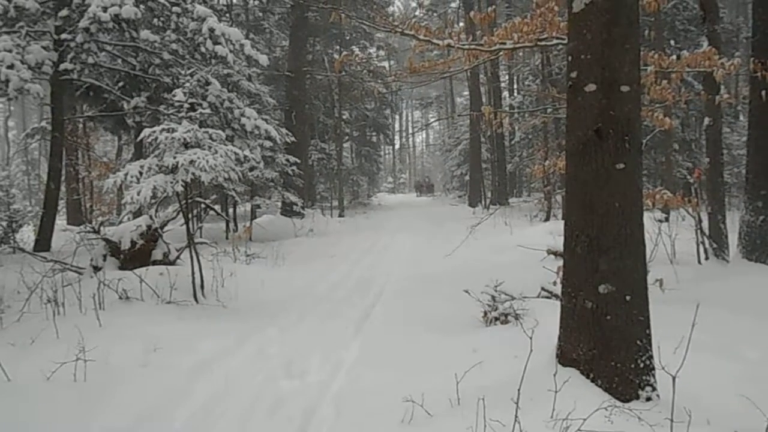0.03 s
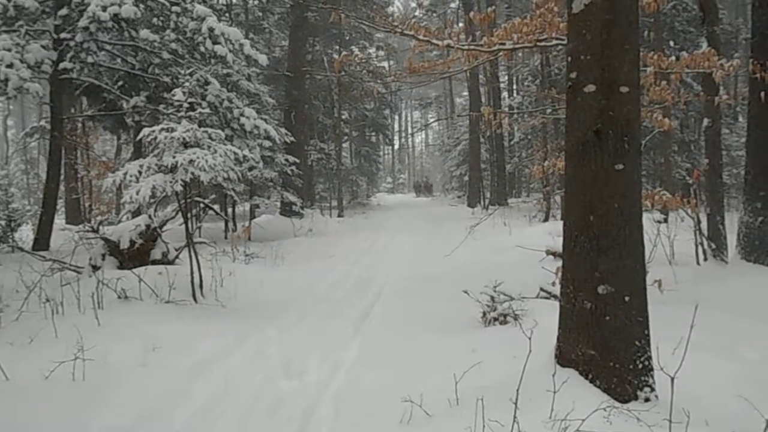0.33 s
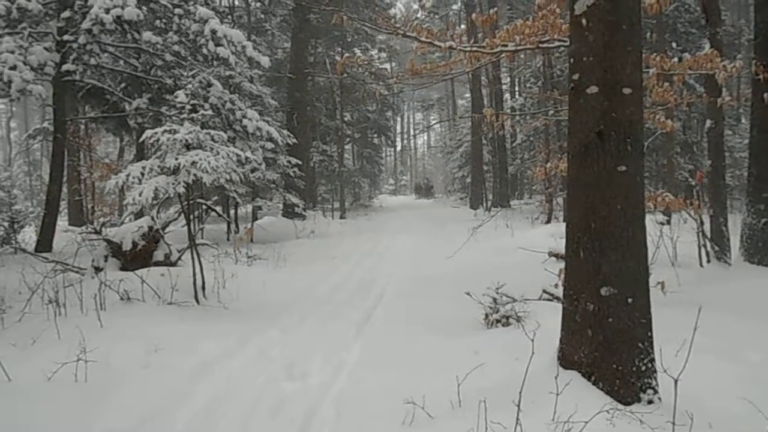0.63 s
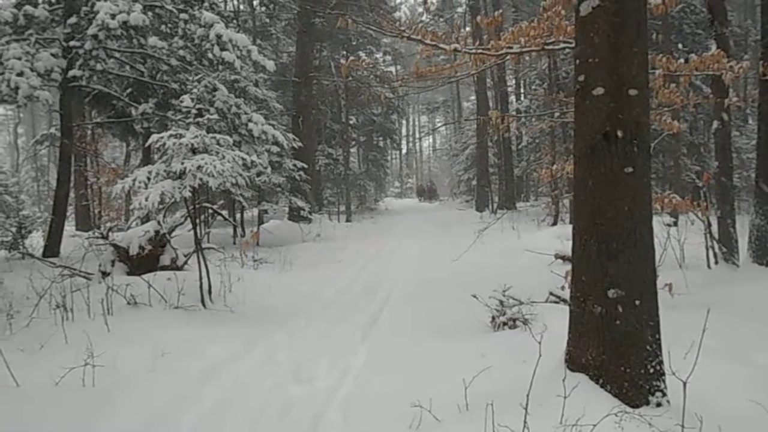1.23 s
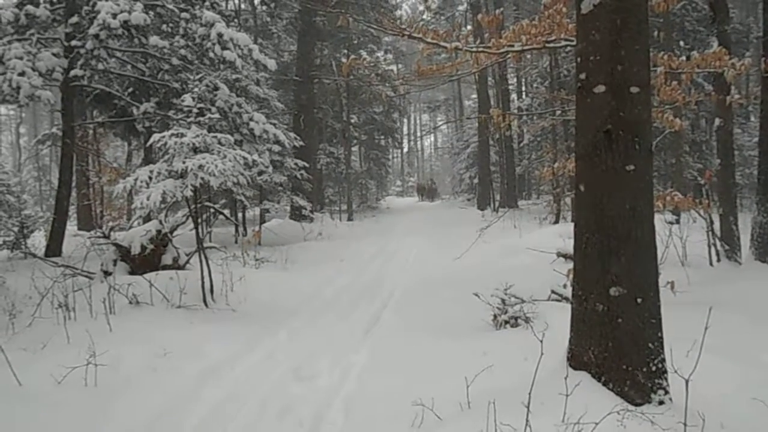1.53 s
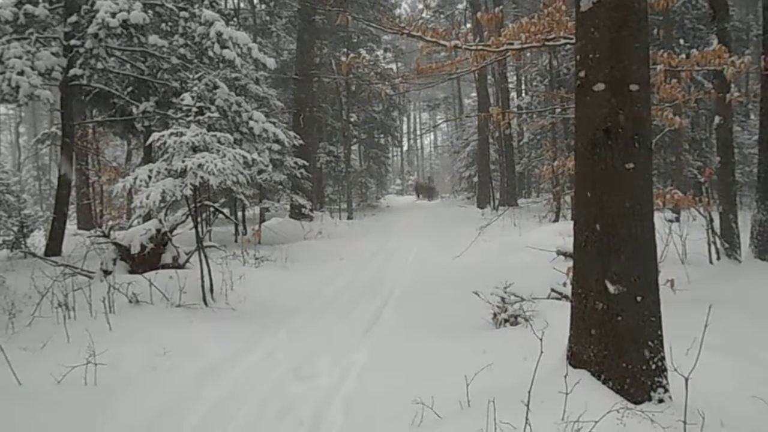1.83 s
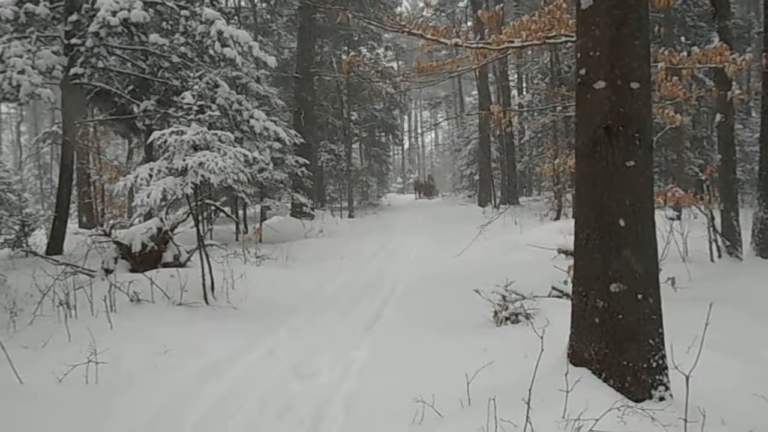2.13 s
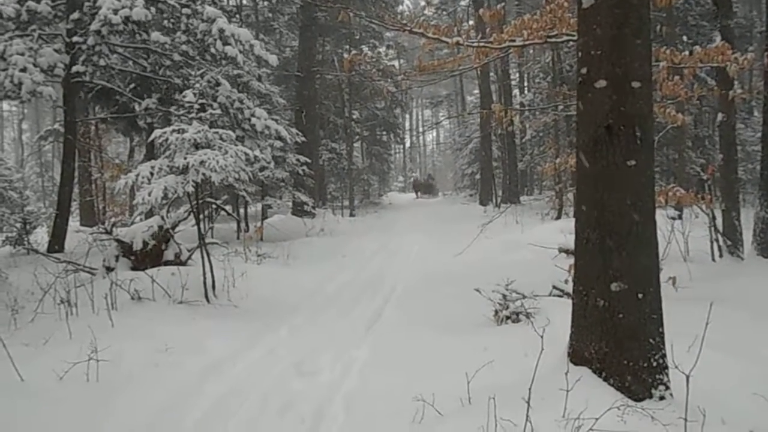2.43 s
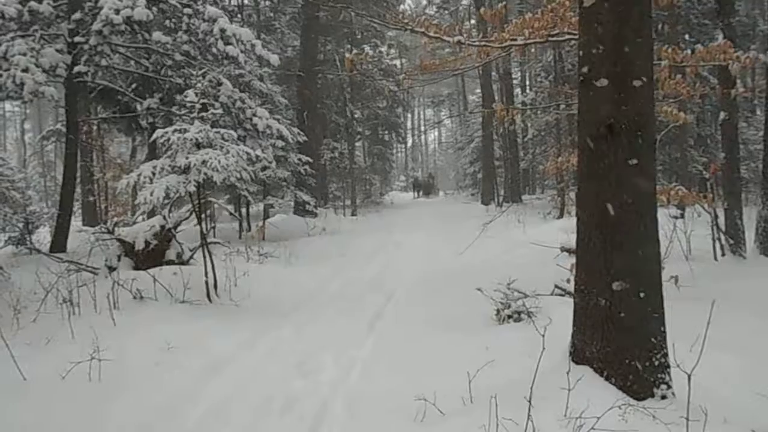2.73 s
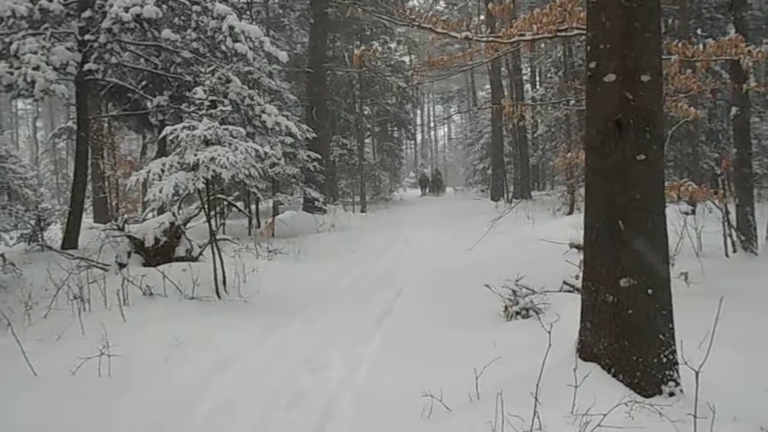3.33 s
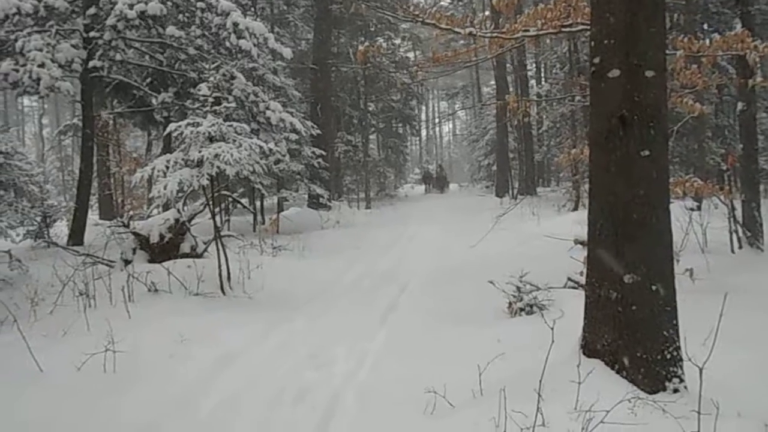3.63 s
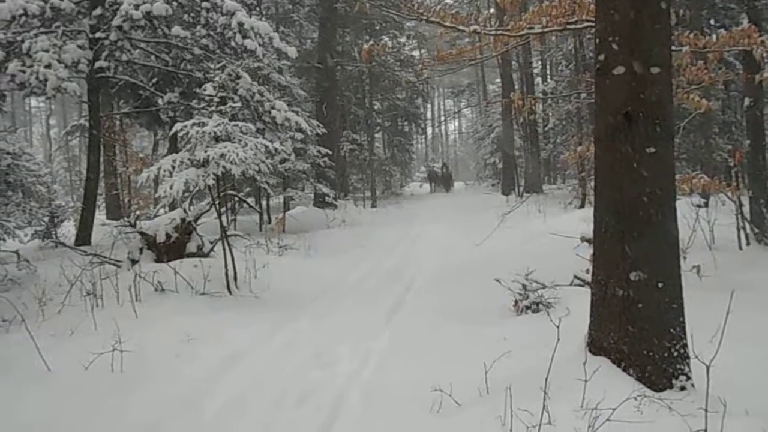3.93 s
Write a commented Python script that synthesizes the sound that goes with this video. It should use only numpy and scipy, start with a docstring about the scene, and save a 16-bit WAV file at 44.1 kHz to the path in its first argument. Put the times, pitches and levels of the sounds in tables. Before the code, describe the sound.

Sleigh bells jingle close by in uneven bursts throughout, bright and high, with a dry rattle of small links. A heavier metal piece clanks sharply at about 0.6, 1.3 and 1.9 seconds, then more lightly around 2.3, 2.7 and 3.1. Snow crunches softly at the start and near 1.2 seconds. A strong bell stroke comes just before 4 seconds. Soft wind hiss and a low rumble continue underneath.

```python
"""Sleigh bells on a snowy forest trail

Close to one microphone, small bells jingle in uneven bursts near 5 and 10 kHz, pellets and links rattle,
and a heavier piece of metal clanks now and then. Snow crunches softly twice. Farther off, wind hisses
in the trees over a low rumble of air. The recorder's gain ducks after the loudest clanks."""
import sys
import numpy as np
from scipy import signal
from scipy.fft import rfft, irfft
from scipy.io import wavfile
from scipy.ndimage import uniform_filter1d, minimum_filter1d

SR = 44100
rng = np.random.default_rng(int(sys.argv[2]) if len(sys.argv) > 2 else 0)


def generate_wav(signal):
    """Clip the signal to [-1, 1] and save it as 16-bit WAV at the path in sys.argv[1]."""
    frames = np.transpose(np.atleast_2d(signal))
    scaled = np.clip(frames, -1, 1) * 32767
    pcm = np.round(scaled).astype(np.int16)
    wavfile.write(sys.argv[1], SR, pcm)


N = 176400
TIME = np.arange(N) / SR
RING_TIME = np.arange(SR // 2) / SR
TREBLE_EDGE_HZ = 10950

# a bell's weak modes just above its main pitch: pitch_hz, level_db
BELL_NEIGHBOURS = [(5588, -19.5), (5905, -21)]
# its overtones, about an octave up: pitch_hz, level_db
BELL_OVERTONES = [(10190, -3), (10180, -3.5), (9360, -13.5), (11050, -19.5), (11820, -12)]

def small_bell(pitch_hz, overtone_db):
    """A pellet strikes the shell and rebounds inside it; close modes beat against the main one."""
    twin_spread_hz, twin_db, detune = 45, -11, 0.00475
    swell_s, rebound_within_s, rebound_db = 0.0013, 0.06, -10
    modes = [(pitch_hz, 0)] + [(pitch_hz + twin_spread_hz * rng.normal(), twin_db) for _ in range(3)]
    modes += [(hz * (1 + detune * rng.normal()), db + 3 * rng.normal()) for hz, db in BELL_NEIGHBOURS]
    modes += [(hz * (1 + detune * rng.normal()), db + overtone_db) for hz, db in BELL_OVERTONES]
    stroke = sum(from_db(db) * mode(hz, t60_s=0.18) for hz, db in modes)
    stroke *= 1 - np.exp(-RING_TIME / swell_s)   # the pellet rolls before the bell rings fully
    lags = (rng.uniform(0, rebound_within_s, size=4) * SR).astype(int)
    rebounds = sum(np.pad(stroke, (lag, 0))[:len(stroke)] for lag in lags)
    return np.std(stroke) * rms_one(stroke + from_db(rebound_db) * rebounds)


# clear strokes of the nearest bells: start_s, level_db, pitch_hz, overtone_db
BELL_STROKES = [(0.0997, -33, 5190, -25), (0.3835, -16, 5145, -14), (0.425, -30, 5180, -7),
                (0.493, -25.5, 5170, -6), (0.53, -36, 5180, -6), (0.62, -23.5, 5200, -8),
                (0.917, -34.5, 5210, 0), (1.1303, -30.5, 5180, -8), (1.203, -26, 5080, -6.5),
                (1.262, -40.5, 5100, 11), (1.45, -40, 5000, 13.5), (1.538, -33, 5260, 2.5),
                (1.658, -27, 5180, -3), (1.69, -32, 5160, -23), (1.8152, -23.5, 5094, -13.5),
                (2.072, -32, 5400, -23), (2.135, -30.5, 4960, 0), (2.24, -20, 5120, -7),
                (2.3047, -20.5, 5200, -14), (2.307, -25.5, 5700, -24), (2.748, -28, 5100, -10),
                (2.835, -28, 5080, -12), (2.925, -26.5, 5160, -7), (2.99, -28, 5080, -5.5),
                (3.03, -26, 5870, -17), (3.1996, -30, 5100, 6), (3.25, -34, 5130, -15),
                (3.33, -30, 5140, -4), (3.8272, -23.5, 5100, 4), (3.855, -25, 5200, -10),
                (3.9045, -22.5, 5060, -12), (3.9507, -11, 5150, -13.5)]
# how hard the bells and fittings are shaken: time_s, gain_db
SHAKING = [(0, 9.5), (.12, -8.5), (.2, 6.5), (.4, 3.5), (.58, 0), (.73, 0), (1.0, -2), (1.25, -3),
           (1.45, 4), (1.8, -4), (2.03, 0), (2.3, 3), (2.72, -1.5), (3.0, 3), (3.3, 4), (3.45, -7.5),
           (3.66, -3.5), (3.9, 4)]

def sleigh_bells():
    """Clear strokes stand over a shimmer of soft ones that follows the shaking."""
    out = np.zeros(N)
    for start_s, level_db, pitch_hz, overtone_db in BELL_STROKES:
        add(out, start_s, from_db(level_db) * small_bell(pitch_hz, overtone_db))
    bells = [small_bell(pitch_hz=5130 + 39 * rng.normal(), overtone_db=-3.5) for _ in range(10)]
    soft_strokes = grains(per_s=60, spread_db=3) * from_db(-45 + curve(SHAKING, TIME))
    which_bell = rng.integers(0, len(bells), N)
    for i in np.flatnonzero(soft_strokes):
        add(out, i / SR, soft_strokes[i] * bells[which_bell[i]])
    return out


# blows on the heavy fitting, close by: start_s, level_db, bass_db, treble_db, ring_db, favoured_hz (list)
FITTING_BLOWS = [(0.1626, -22, -10, 10, 1, [9750]), (0.187, -22.5, 9, 7, -5.5, [3052]),
                 (0.3881, -19.5, -12, -4, -6.5, [4355]),
                 (0.587, -3, -1.5, -3, -8, [1198, 1803, 3052, 4355, 4759]),
                 (1.0286, -20.5, -3, -4.5, -13, [3052, 4355]),
                 (1.318, -9.5, 2, -4, -2, [3844, 4064, 4355, 4759, 9080, 9750]),
                 (1.338, -14.5, 2, 5, -3.5, [4759]), (1.615, -25.5, 15, 7, -11, [1803]),
                 (1.9137, -4, 1.5, -4, -5.5, [3144, 4064, 4355]),
                 (2.261, -11, 6, -6, -2.5, [1198, 1803, 3144]), (2.277, -16, 7, -1, -2, [1803, 3052]),
                 (2.5296, -26, 4, 2, 2, [1168]), (2.62, -24, 9, 12, 5, [10170]),
                 (2.639, -20.5, 3, 8, -2.5, [1168]), (2.657, -15, 3, -8, -1.5, [1168, 1803]),
                 (3.1316, -15, 6, 1, -6, [3844, 9080]), (3.14, -14.5, 1, 5, -5, [4064, 5100]),
                 (3.288, -25.5, -14, -9, -5.5, [3052]), (3.3698, -23.5, -11, 13, -6, [4759]),
                 (3.512, -25.5, 12.5, 5, -9, [3144]), (3.898, -26, -16, -15, -5, [4064]),
                 (3.9283, -21.5, -19, 5, -13, [4355]), (3.9705, -22, -12, 10, -12, [3052])]
# its modes: pitch_hz, level_db, t60_s
FITTING_MODES = [(1168, -6, .1), (1198, -9, .2), (1803, -9, .26), (3052, -6, .31), (3144, 0, .1),
                 (3381, -3, .1), (3844, -1, .11), (4064, 0, .11), (4355, -3, .115), (4759, 1, .12),
                 (5100, -5, .1), (8600, -10, .12), (9080, -6, .15), (9750, -8, .15), (10170, -7, .12)]
# its dense, short clatter: frequency_hz, density_db
CLATTER_SPECTRUM = [(600, -33), (1000, -11.5), (1200, -6.5), (1400, -12.5), (1750, -5.5), (2300, -4),
                    (2700, -13), (3200, 0), (3600, -1), (4700, 1), (5500, -7.5), (6800, -15), (8300, -12),
                    (10100, -5), (11000, -18.5)]

def clanks():
    """Each blow gives a short clatter; the point of contact sets its colour and which modes ring out."""
    near_node_db, scatter_db, scatter_hz = -11.5, 2, 7
    out = np.zeros(N)
    for start_s, level_db, bass_db, treble_db, ring_db, favoured_hz in FITTING_BLOWS:
        tilt = [(2000, bass_db), (3300, 0), (4800, 0), (8500, treble_db)]
        spectrum = [(hz, db + curve(tilt, hz)) for hz, db in CLATTER_SPECTRUM]
        clatter = peaky_noise(spectrum, peaks_db=4, step_hz=90) * decay(t60_s=0.088)
        ring = np.zeros(len(RING_TIME))
        for hz, db, t60_s in FITTING_MODES:
            # modes with a node near the point of contact ring less
            mode_db = db + near_node_db * (hz not in favoured_hz) + scatter_db * rng.normal()
            ring += from_db(mode_db) * mode(hz + scatter_hz * rng.normal(), t60_s)
        add(out, start_s, from_db(level_db) * (clatter + from_db(ring_db) * ring))
    return out


# dry clicks of pellets and links, close by: start_s, level_db, t60_s
PELLET_CLICKS = [(0.034, -26, 0.018), (0.0988, -26, 0.012), (0.161, -19.5, 0.12), (0.511, -23, .04),
                 (0.85, -26.5, 0.018), (1.0812, -16.5, 0.008), (1.2544, -20.5, 0.13), (1.493, -24.5, 0.031),
                 (1.766, -27, 0.19), (1.8163, -23, 0.05), (2.042, -28, .02), (2.2052, -16.5, 0.11),
                 (2.397, -23, 0.023), (2.429, -27.5, 0.054), (2.8804, -21, 0.049), (2.892, -23, 0.23),
                 (3.024, -24.5, 0.15), (3.183, -23.5, 0.16), (3.3722, -16.5, 0.022), (3.471, -26, 0.048),
                 (3.5, -30, 0.036), (3.5136, -20, 0.016), (3.557, -27, 0.098), (3.691, -23.5, 0.025),
                 (3.7204, -21, 0.02), (3.786, -22, 0.086), (3.808, -21.5, 0.053), (3.827, -14, 0.055),
                 (3.898, -24, 0.023), (3.9503, -18, 0.024)]
# the colour of their knocking: frequency_hz, density_db
RATTLE_SPECTRUM = [(900, -7.5), (1800, -2.5), (2700, -5.5), (3700, 3), (4500, 0.5), (5600, -0.5),
                   (6800, -5.5), (7600, -0.5), (8600, -5.5), (9600, -6), (10600, -11), (12000, -35)]

def rattle():
    """Pellets and links knock: single sharp clicks among many small ticks that follow the shaking."""
    ticks = grains(per_s=170, spread_db=5)
    power = signal.fftconvolve(ticks ** 2, decay(t60_s=0.058) ** 2)[:N]
    envelope = np.sqrt(np.abs(power) / power.mean()) * from_db(-39 + curve(SHAKING, TIME))
    out = envelope * noise(RATTLE_SPECTRUM, N)
    for start_s, level_db, t60_s in PELLET_CLICKS:
        click = decay(t60_s) * peaky_noise(RATTLE_SPECTRUM, peaks_db=4.5, step_hz=350)
        add(out, start_s, from_db(level_db) * click)
    return butterworth(out, 2, 700, "high")


# links, then the fine shimmer of the farther bells: touches_per_s, base_db, low_hz, high_hz, t60_s
PING_LAYERS = [(148, -40, 3300, 5390, 0.026), (436, -46.5, 5800, 11000, 0.018)]

def pings(touches_per_s, base_db, low_hz, high_hz, t60_s):
    """Small metal parts touch, each with a brief pitch of its own and an inharmonic overtone."""
    overtone_ratio, overtone_db, ping_samples = 1.7, -8.5, SR // 32
    touches = grains(touches_per_s, spread_db=3.5) * from_db(base_db + curve(SHAKING, TIME) / 2)
    pitch_hz = low_hz * (high_hz / low_hz) ** rng.random(N)
    overtone_hz = pitch_hz * overtone_ratio * (1 + 0.12 * rng.standard_normal(N))
    overtone_gain = from_db(overtone_db) * (overtone_hz < TREBLE_EDGE_HZ)
    phase_per_hz = 2 * np.pi * RING_TIME[:ping_samples]
    envelope = decay(t60_s)[:ping_samples]
    out = np.zeros(N)
    for i in np.flatnonzero(touches):
        fundamental = np.sin(pitch_hz[i] * phase_per_hz)
        overtone = overtone_gain[i] * np.sin(overtone_hz[i] * phase_per_hz)
        add(out, i / SR, touches[i] * envelope * (fundamental + overtone))
    return out


# snow gives way on the trail: start_s, length_s, level_db
SNOW_CRUNCHES = [(0.083, 0.22, -27.5), (1.155, 0.07, -31.5)]
# the largest pops in it: start_s, level_db, pitch_hz
SNOW_POPS = [(0.097, -18.5, 234), (0.112, -13.5, 209), (0.167, -16.5, 650), (0.222, -18.5, 348),
             (0.233, -11, 198), (0.256, -22, 444), (0.279, -11.5, 289), (0.306, -14, 507),
             (1.182, -20, 382), (1.191, -18.5, 348)]

def snow():
    """Packed snow collapses in a run of dull little pops."""
    attack_s, release_s = 0.024, 0.042
    pops = grains(per_s=600, spread_db=0) * rng.choice([-1, 1], N)
    pops = butterworth(pops, 1, [101, 734], "band")
    pops = butterworth(pops, 2, [90, 2000], "band")
    attack = 1 - np.exp(-RING_TIME / attack_s)
    out = np.zeros(N)
    for start_s, length_s, level_db in SNOW_CRUNCHES:
        run = pops[int(start_s * SR):][:len(RING_TIME)]
        run = run / np.std(run[RING_TIME < length_s])
        release = np.exp(-np.maximum(RING_TIME - length_s, 0) / release_s)
        add(out, start_s, from_db(level_db) * attack * release * run)
    for start_s, level_db, pitch_hz in SNOW_POPS:
        add(out, start_s, from_db(level_db) * mode(pitch_hz, t60_s=0.013))
    return out


# wind in the trees around the trail: frequency_hz, density_db
WIND_SPECTRUM = [(60, -25), (110, -5.5), (165, -1.5), (400, -10), (750, -3.5), (1200, -6), (2600, -13.5),
                 (4000, -15.5), (7000, -26), (10000, -21), (12000, -47)]
# its strength: time_s, level_db
WIND_STRENGTH = [(0, -36), (.8, -35.5), (1.3, -35.5), (2.0, -36.5), (3.2, -35.5), (4, -33)]

def wind():
    """Wind hisses evenly in the trees; the level flutters by about a decibel."""
    flutter_db = rms_one(signal.resample(rng.standard_normal(40), N))
    return from_db(curve(WIND_STRENGTH, TIME) + flutter_db) * noise(WIND_SPECTRUM, N)


# low air at the microphone: frequency_hz, density_db
RUMBLE_SPECTRUM = [(20, 1), (36, 13), (50, -6.5), (65, -1.5), (79, 8), (95, 1), (130, -23), (250, -42)]
# its strength: time_s, level_db
RUMBLE_STRENGTH = [(0, -36), (.5, -37), (.9, -38), (1.35, -33), (1.7, -40), (2.2, -40.5), (2.7, -41),
                   (3.2, -40.5), (4, -37.5)]

def rumble():
    """The air buffets, mostly below 100 Hz."""
    return from_db(curve(RUMBLE_STRENGTH, TIME)) * noise(RUMBLE_SPECTRUM, N)


def from_db(db):
    """Decibels to gain."""
    return 10 ** (np.asarray(db) / 20)


def rms_one(x):
    """Scale to unit power."""
    return x / np.sqrt(np.mean(x ** 2) + 1e-20)


def curve(points, at):
    """Straight lines between points."""
    return np.interp(at, *np.transpose(points))


def butterworth(x, order, edges_hz, kind):
    """A low-, high- or band-pass filter."""
    return signal.sosfilt(signal.butter(order, edges_hz, kind, fs=SR, output="sos"), x)


def noise(spectrum, samples):
    """Noise with a given spectrum, at unit power."""
    hz, db = np.transpose(spectrum)
    bin_hz = np.maximum(np.fft.rfftfreq(samples, 1 / SR), 1)
    gain = from_db(np.interp(np.log(bin_hz), np.log(hz), db))
    return rms_one(irfft(rfft(rng.standard_normal(samples)) * gain, samples))


def peaky_noise(spectrum, peaks_db, step_hz):
    """A short noise with a given spectrum and random peaks of its own."""
    grid_hz = np.arange(600, 12500, step_hz)
    density_db = curve(spectrum, grid_hz) + peaks_db * rng.standard_normal(len(grid_hz))
    return noise(np.column_stack([grid_hz, density_db]), len(RING_TIME))


def decay(t60_s):
    """Exponential decay from 1."""
    return np.exp(-np.log(1000) * RING_TIME / t60_s)


def mode(hz, t60_s):
    """A struck mode of either sign, starting at unit power."""
    return rng.choice([-1, 1]) * np.sqrt(2) * np.sin(2 * np.pi * hz * RING_TIME) * decay(t60_s)


def grains(per_s, spread_db):
    """Random impulses; the spread makes a few larger than the rest."""
    return (rng.random(N) < per_s / SR) * from_db(spread_db * np.minimum(rng.exponential(1, N), 3.5))


def add(out, start_s, sound):
    """Mix a sound in at a time."""
    i = int(np.clip(start_s * SR, 0, N - 1))
    out[i:i + len(sound)] += sound[:N - i]


def scene():
    """Metal, snow and wind reach one microphone in open air."""
    trail = wind() + rumble() + snow()
    metal = rattle() + clanks() + sleigh_bells() + sum(pings(*layer) for layer in PING_LAYERS)
    return (trail + metal)[None]


def record(dry):
    """Gain ducks at once and recovers slowly; the treble is cut, and the hardest clanks overload."""
    limit_db, slope, recovery_db_per_s, overload_level = -11.5, 0.83, 12, 0.7
    level_db = 10 * np.log10(np.abs(uniform_filter1d(dry[0] ** 2, size=176)) + 1e-12)   # over 4 ms
    peak_db = -minimum_filter1d(-level_db, size=88)   # looks 1 ms ahead
    over_db = slope * np.maximum(peak_db - limit_db, 0)
    recovery_db = recovery_db_per_s * TIME
    duck_db = np.maximum.accumulate(over_db + recovery_db) - recovery_db
    out = dry * from_db(-uniform_filter1d(duck_db, size=88))
    out = butterworth(out, 6, TREBLE_EDGE_HZ, "low")
    out = signal.sosfilt(signal.ellip(10, .3, 70, 12177, fs=SR, output="sos"), out)
    out = np.clip(out, -overload_level, overload_level)   # a bright snap, reaching above the treble cut
    return signal.sosfilt(signal.ellip(10, .1, 70, 16000, fs=SR, output="sos"), out)


dry = scene()
out = record(dry)
generate_wav(out)
```